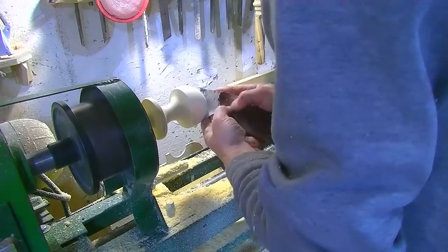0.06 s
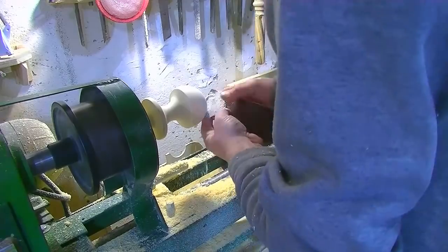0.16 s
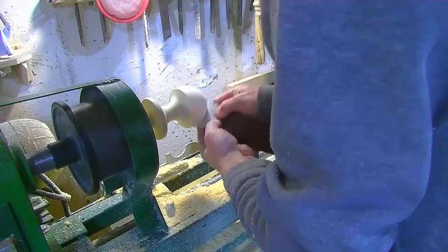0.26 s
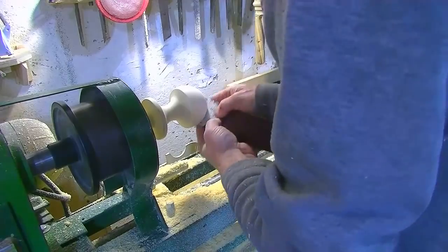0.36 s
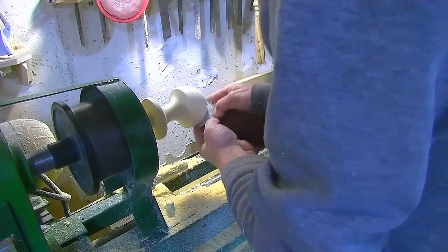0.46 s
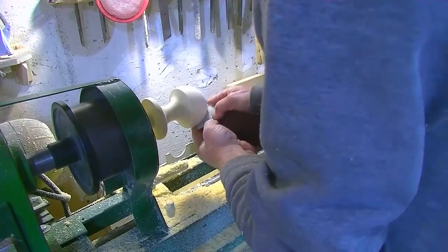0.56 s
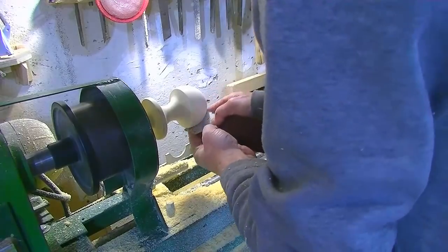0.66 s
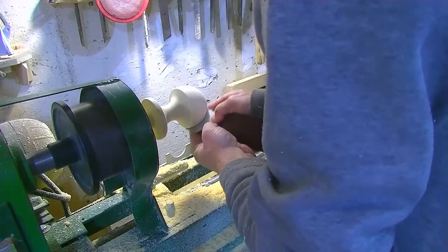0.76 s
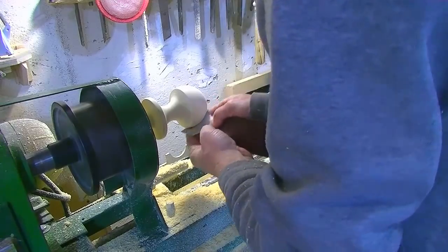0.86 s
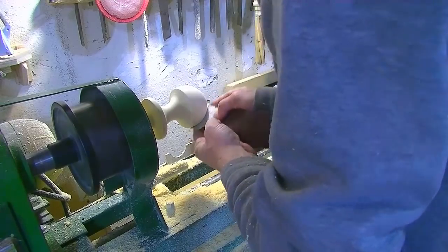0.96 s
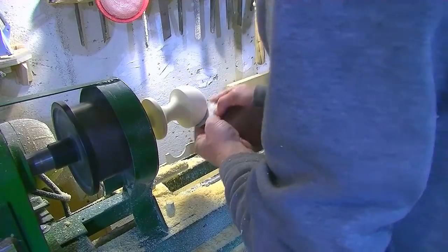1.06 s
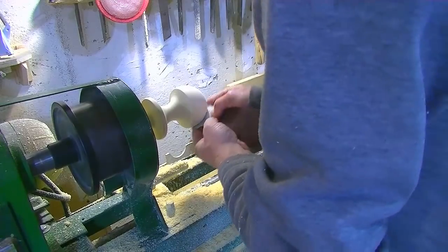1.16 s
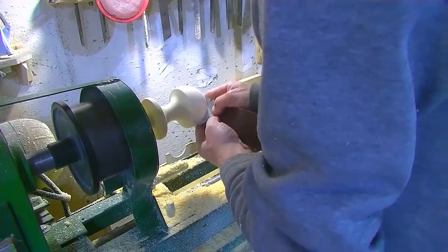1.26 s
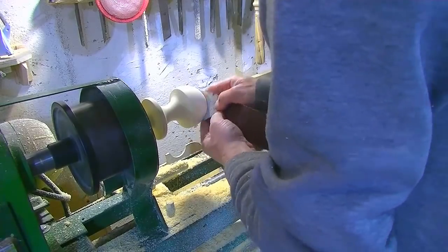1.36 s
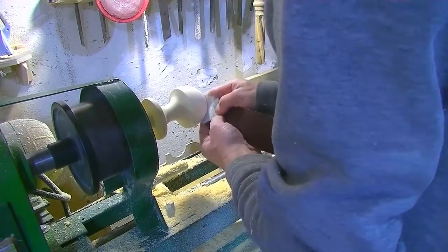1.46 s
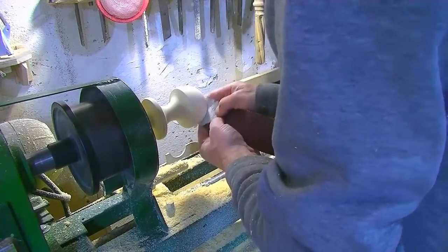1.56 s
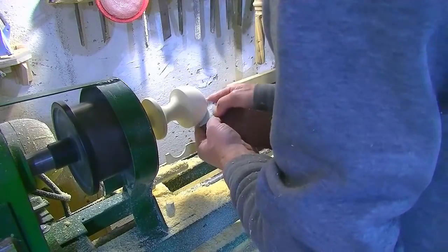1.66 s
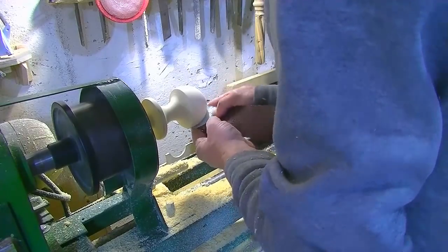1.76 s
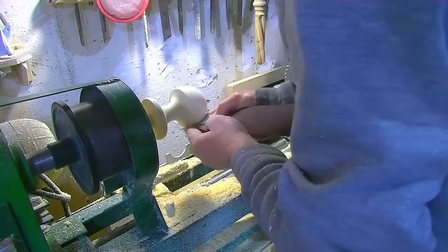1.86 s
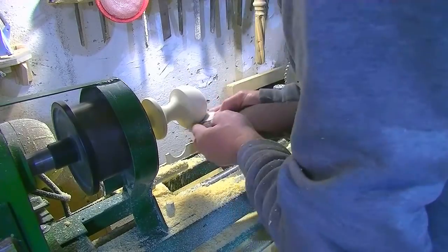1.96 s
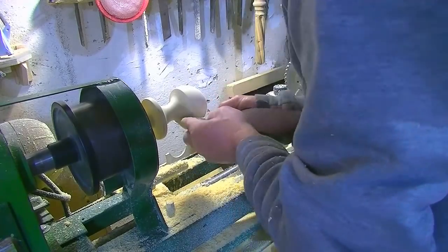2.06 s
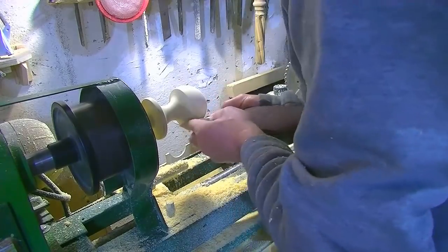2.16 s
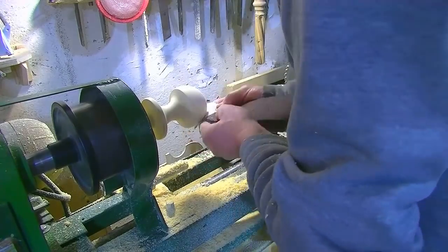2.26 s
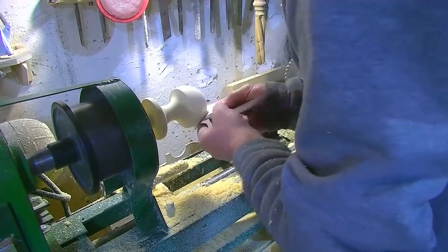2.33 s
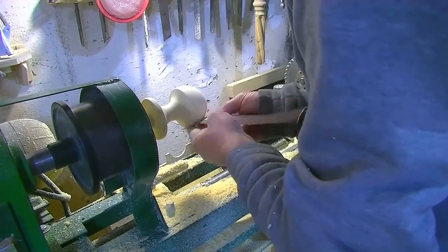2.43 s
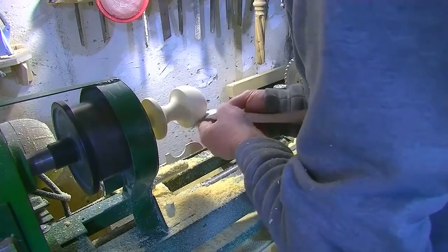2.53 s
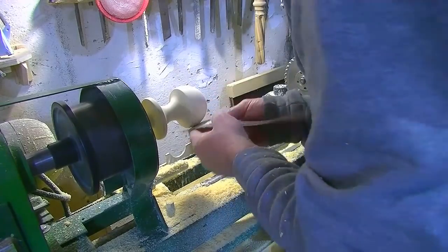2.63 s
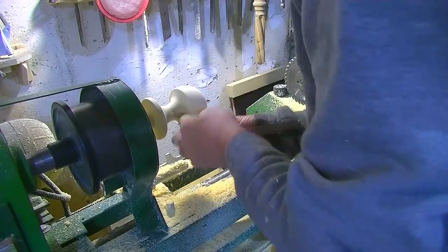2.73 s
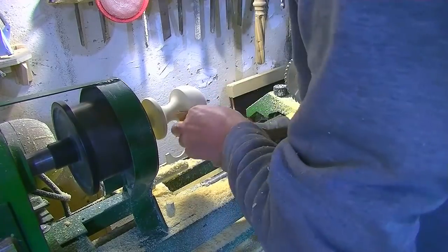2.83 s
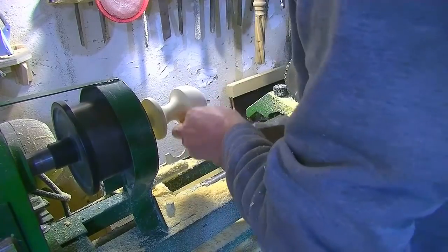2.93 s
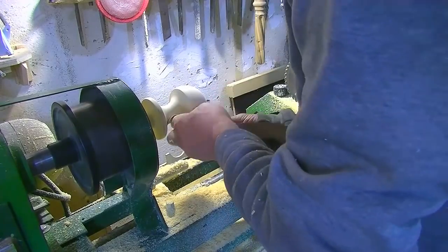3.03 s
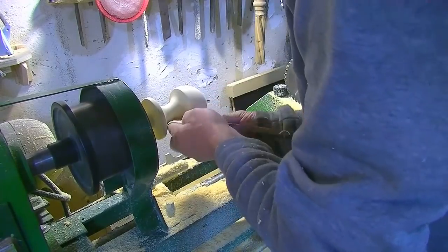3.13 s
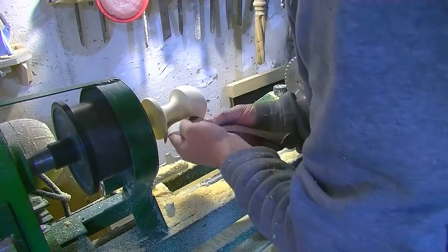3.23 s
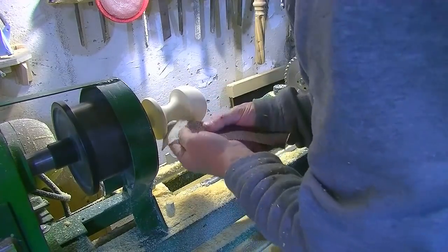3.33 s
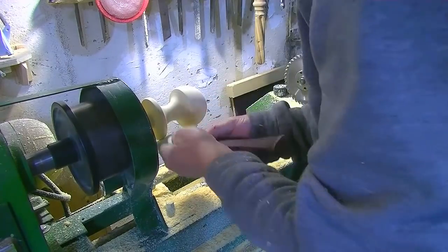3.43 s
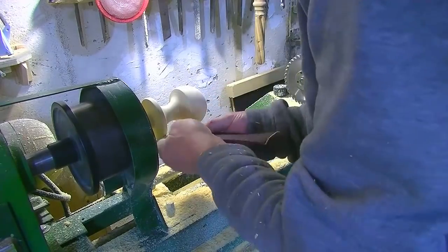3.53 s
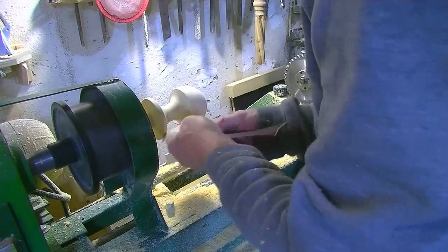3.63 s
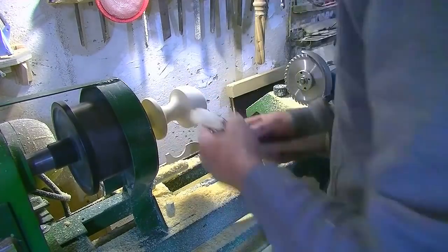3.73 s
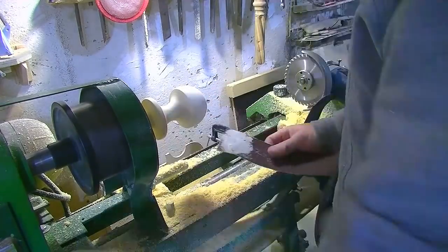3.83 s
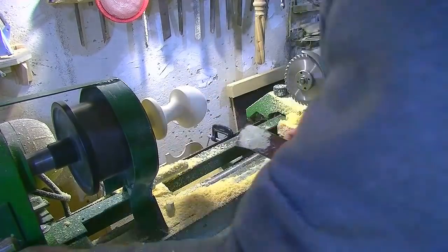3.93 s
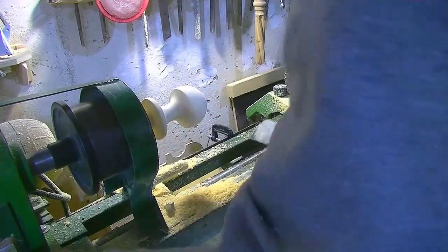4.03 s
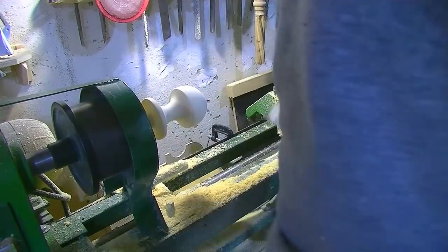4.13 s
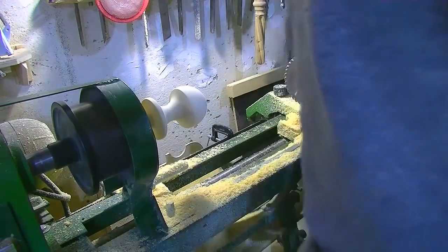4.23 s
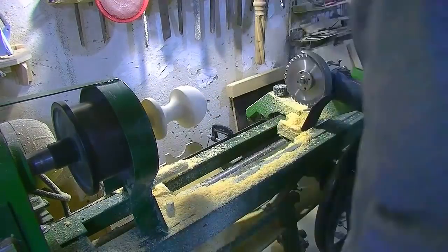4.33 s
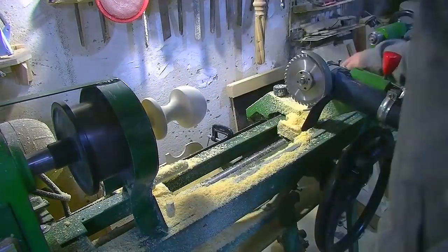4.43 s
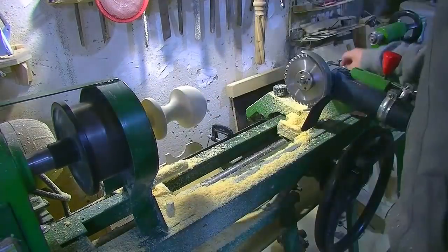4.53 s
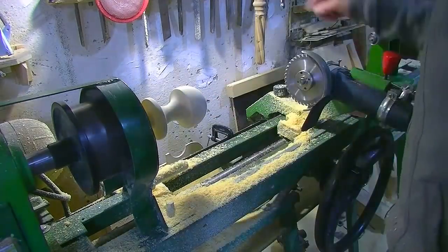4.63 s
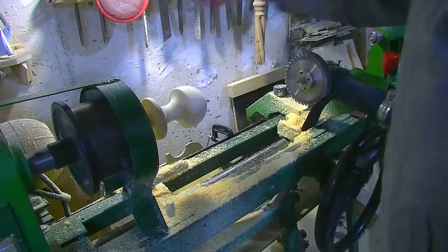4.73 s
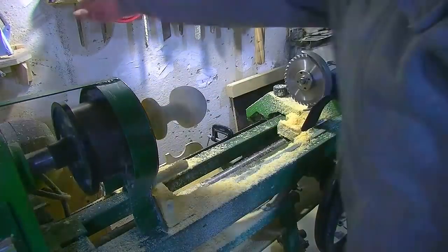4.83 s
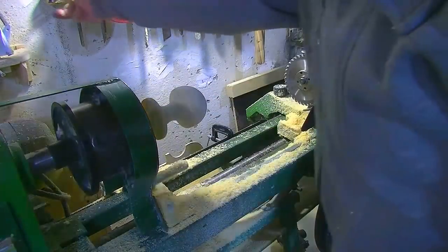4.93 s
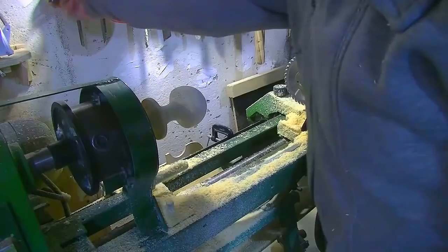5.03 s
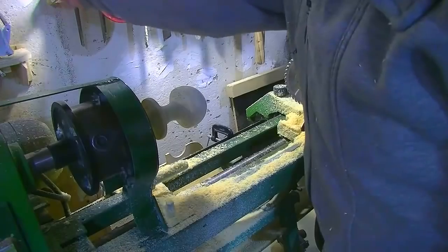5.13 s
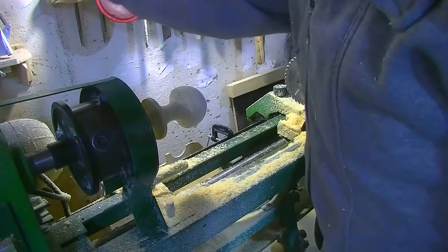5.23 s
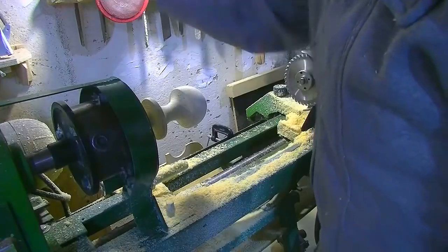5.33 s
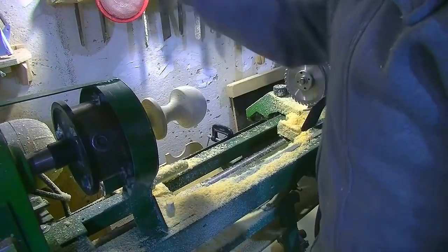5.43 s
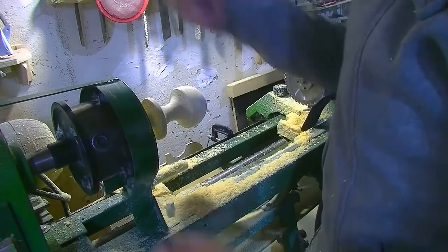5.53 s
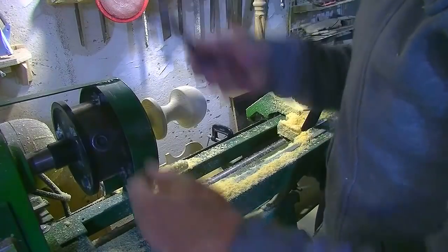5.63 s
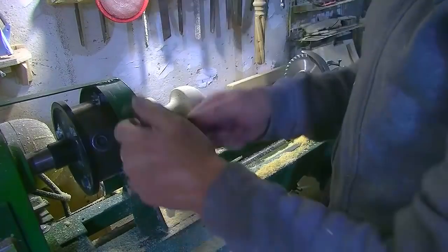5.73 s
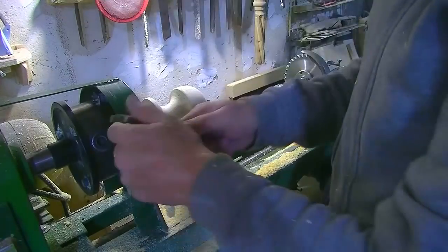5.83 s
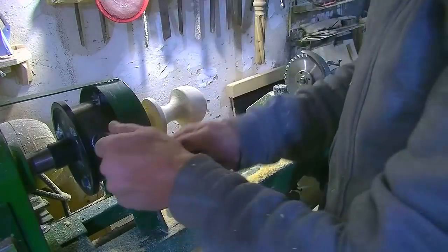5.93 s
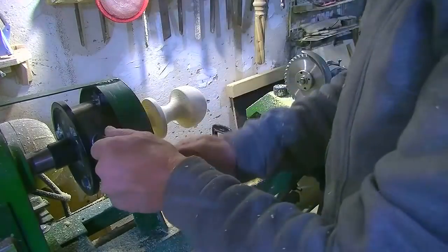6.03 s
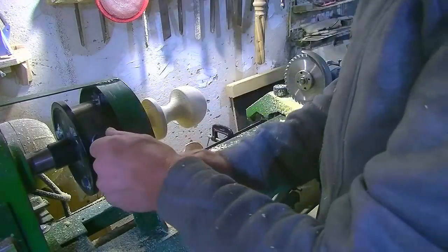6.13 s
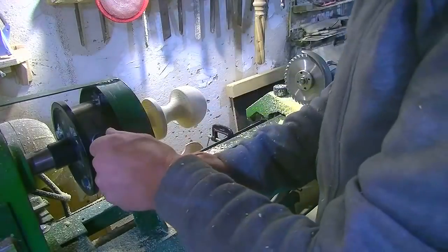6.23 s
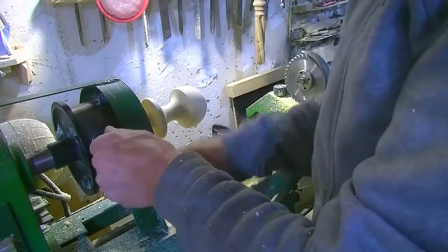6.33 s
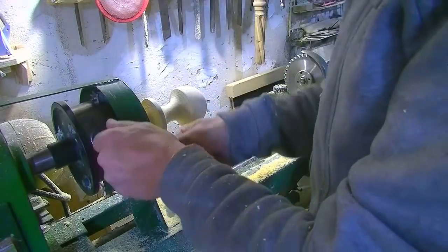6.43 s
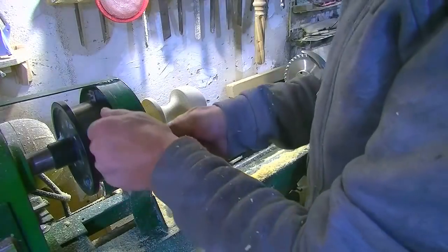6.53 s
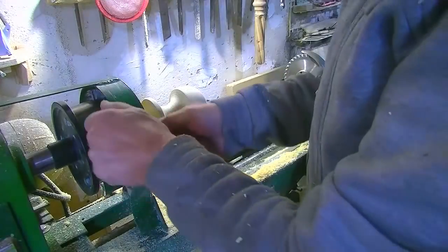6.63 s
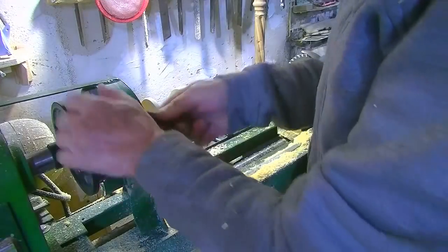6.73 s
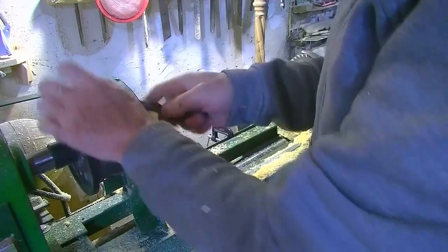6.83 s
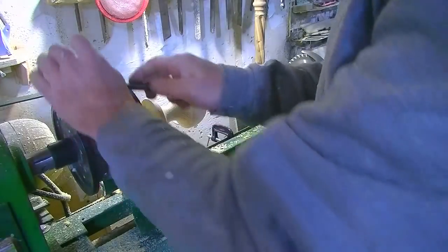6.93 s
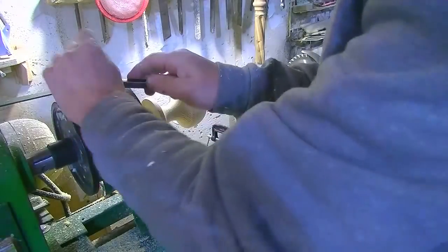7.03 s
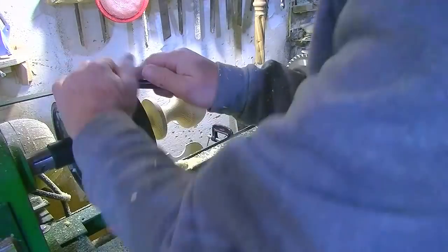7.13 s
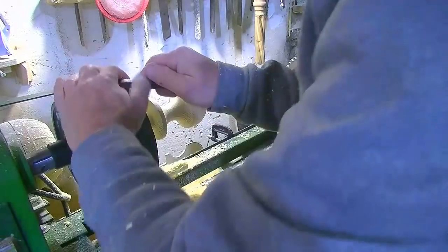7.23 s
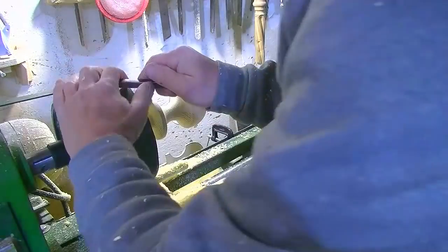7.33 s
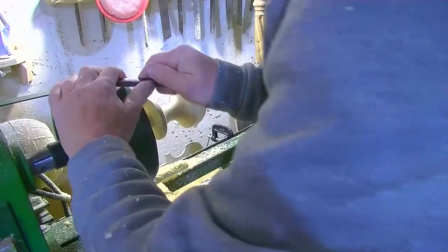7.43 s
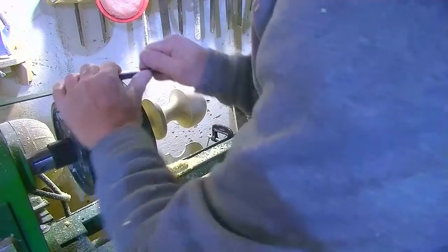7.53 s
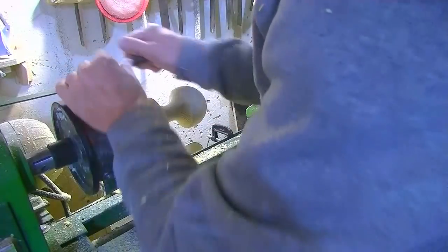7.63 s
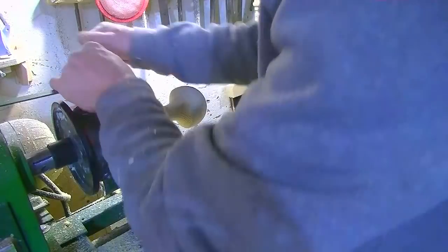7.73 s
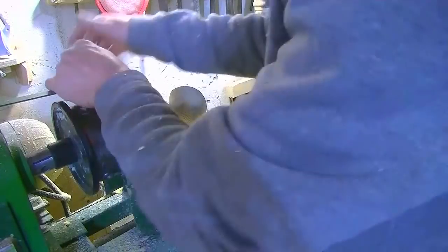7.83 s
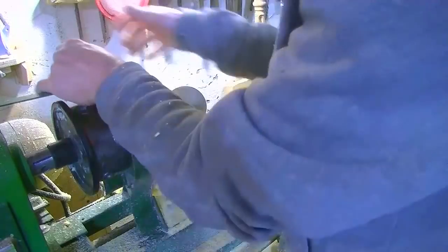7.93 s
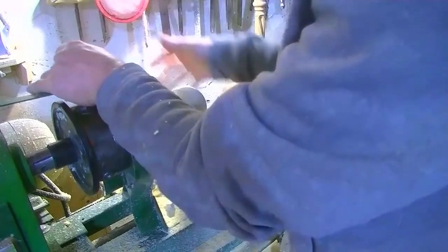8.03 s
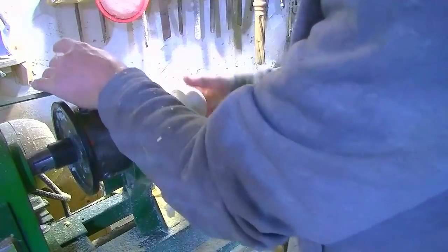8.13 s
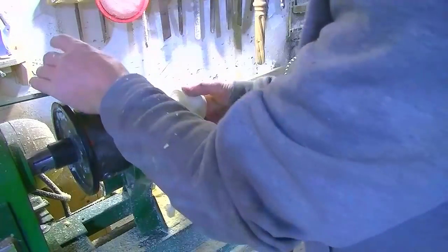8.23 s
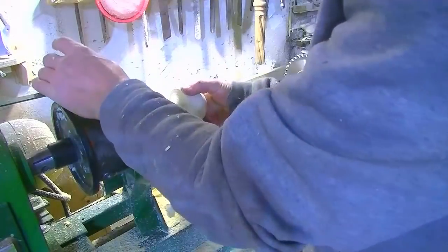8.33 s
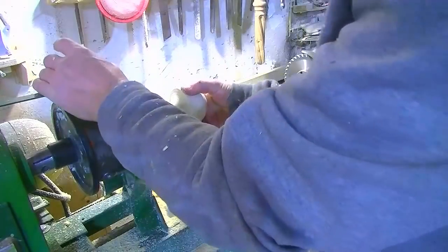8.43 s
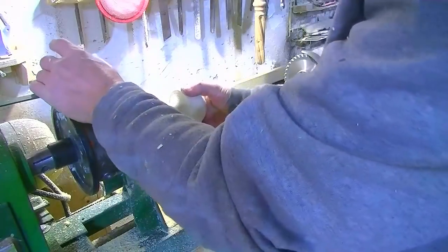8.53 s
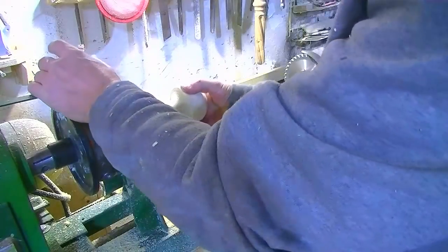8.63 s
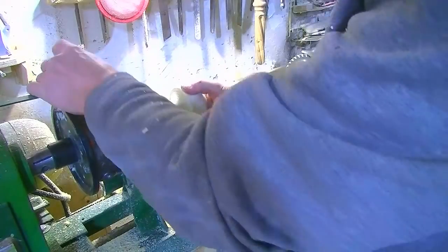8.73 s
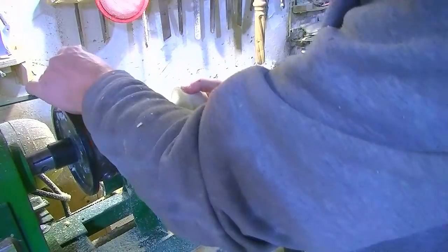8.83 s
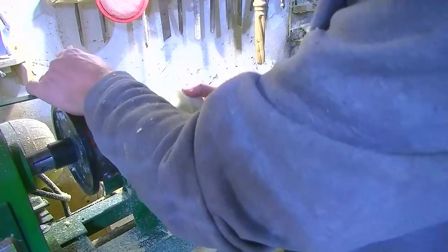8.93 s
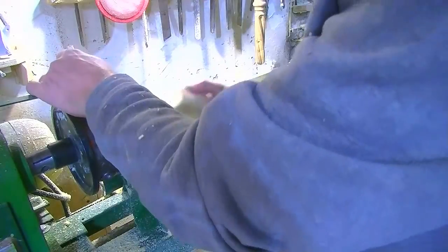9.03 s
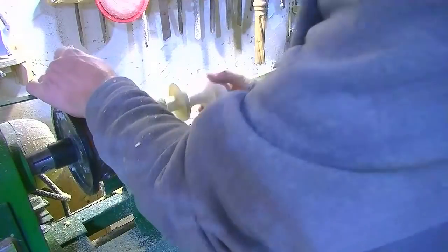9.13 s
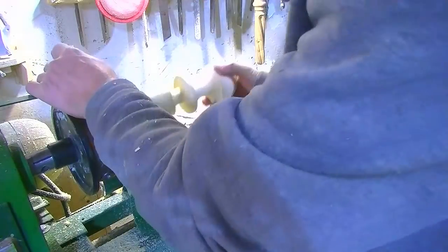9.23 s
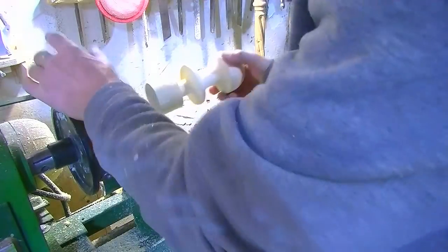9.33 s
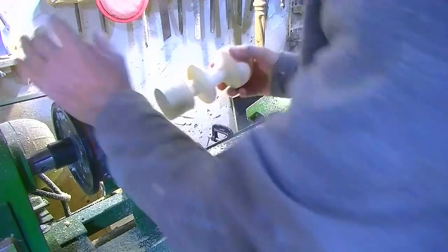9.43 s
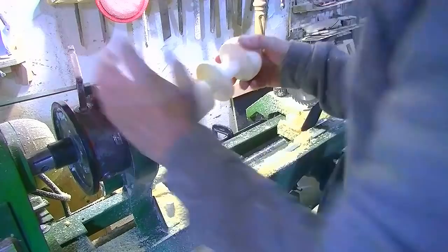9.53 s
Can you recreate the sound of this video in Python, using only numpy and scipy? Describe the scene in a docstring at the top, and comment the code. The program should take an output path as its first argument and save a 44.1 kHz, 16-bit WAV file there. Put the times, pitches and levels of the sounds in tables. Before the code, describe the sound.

Sandpaper buzzes fast on a spinning wooden knob over a whirring lathe, the machine fades, then a steel key clinks and hard knocks free the work.

```python
"""Sandpaper rasps a wooden knob spinning on a small lathe, close by in a small workshop: coloured noise
swells once a turn as the high spot bites. Under it the lathe whirrs (noise with housing resonances) and
the motor whines (shaft orders). The motor is switched off and the sound is faded out. Then hands fit a
steel key, knock the work loose and screw the knob off: resonant bursts and struck modes, with sparse room
echoes, over still air, a thin whistle, cloth and short slides."""
import sys
import numpy as np
from scipy import signal
from scipy.io import wavfile
from scipy.ndimage import uniform_filter1d

SR = 44100
rng = np.random.default_rng(int(sys.argv[2]) if len(sys.argv) > 2 else 0)


def store_wav(level_fs):
    """Save 16-bit WAV to argv[1]."""
    pcm = np.round(np.clip(np.atleast_2d(level_fs), -1, 1) * 32767)
    wavfile.write(sys.argv[1], SR, pcm.T.astype(np.int16))


N = 422037
T = np.arange(N) / SR  # s
QUIET_FROM_S = 4.935  # the quiet workshop fades in; from here on handling also rings bench and headstock


def amp(db):
    """Amplitude factor of a level in dB."""
    return 10 ** (np.asarray(db) / 20)


def evened(x):
    """Scales a signal to power 1."""
    return x / np.sqrt(np.mean(x ** 2) + 1e-20)


def read(points, hz):
    """Value of a (Hz, value) table on a log axis."""
    f, value = np.transpose(points)
    return np.interp(np.log(hz + 1), np.log(f + 1), value)


def columns(rows):
    """Each column of a curve table at every sample."""
    s, *cols = np.transpose(rows)
    return [np.interp(T, s, c) for c in cols]


def held(start, end, rise_db_per_s, fall_db_per_s):
    """Level in dB: 0 from start to end, sloping away before and after."""
    return np.minimum(0, np.minimum(rise_db_per_s * (T - start), fall_db_per_s * (end - T)))


def resonate(x, hz, width):
    """A resonance of gain 1 that follows the curve hz."""
    turn = np.exp(2j * np.pi * np.cumsum(hz * np.ones(x.shape[-1])) / SR)
    r = np.exp(-np.pi * width / SR)
    return 2 * (turn * signal.lfilter([1 - r], [1, -r], x / turn)).real


def resonate_twice(x, hz, width):
    """Two equal resonances in a row, for steeper skirts."""
    return resonate(resonate(x, hz, width), hz, width)


def flicker(ms, db):
    """Random gain of power 1 that changes within ms."""
    drift = evened(uniform_filter1d(rng.standard_normal(N), max(int(ms * SR / 1000), 1)))
    return evened(amp(db * drift))


# Likeness of the two microphone channels near the lathe: pitch_hz, likeness (0 to 1)
LIKENESS = [(60, .3), (500, 0.95), (15000, 0.9)]
# Left-right balance, positive to the left: pitch_hz, level_db
LEAN = [(200, 0.2), (5000, 3.), (15000, 2.5)]


def noise(spectrum, patchy_db, alike, modes=()):
    """Stereo noise with colour and drifting patches; alike scales left-right likeness and lean."""
    frames, hz = N // 256 + 5, np.fft.rfftfreq(1024, 1 / SR)
    a, b, c, d, patches = rng.standard_normal((frames, 513, 5)).T
    patches = evened(uniform_filter1d(uniform_filter1d(patches, size=14, axis=0), size=10, axis=1))
    same = np.clip(alike * read(LIKENESS, hz), -1, 1)[:, None]
    left = a + 1j * b
    right = same * left + np.sqrt(1 - same ** 2) * (c + 1j * d)
    peaks = sum(amp(db) ** 2 / (1 + (2 * (hz - f) / w) ** 2) for f, w, db in modes)
    colour = amp(read(spectrum, hz)) * np.sqrt(1 + peaks)
    lean = amp(np.outer([.5, -.5], alike * read(LEAN, hz)))
    z = np.array([left, right]) * (lean * colour)[:, :, None] * amp(patchy_db * patches)
    return evened(signal.istft(z, nperseg=1024, noverlap=768)[1][:, :N])


def add(mix, s, db, pan_db, sound):
    """Places a sound at s, scaled to its peak; positive pan leans left."""
    part = mix[:, round(s * SR):][:, :len(sound)]
    gain = amp(db + np.array([[.5], [-.5]]) * pan_db)
    part += (gain * sound / abs(sound).max())[:, :part.shape[1]]


def rung(modes, drive, sharp_db):
    """A drive rings a set of modes, tilted by sharp_db an octave about 2500 Hz."""
    t = T[:len(drive)]
    ring = 0
    for hz, db, t60 in modes:
        level_db = db + sharp_db * np.log2(hz / 2500) - 60 * t / t60
        ring = ring + amp(level_db) * np.sin(2 * np.pi * hz * t)
    return signal.fftconvolve(drive, ring)[:len(t)]


# Colour of the still air: pitch_hz, level_db per Hz
HUSH = [(40, -23.5), (150, -16), (280, -4.5), (600, -5.5), (2500, -11), (13000, -23), (16000, -18.5)]
HUSH_DB, WHISTLE_HZ, WHISTLE_DB = -62, 14610, -75  # a thin electric whistle
# Colour of hands shuffling on wood and iron: pitch_hz, level_db per Hz
SHUFFLE = [(60, -56), (200, -14), (500, 0), (1100, 3.5), (2500, -2), (5000, -11), (9000, -30)]
# Colour of rustling cloth: pitch_hz, level_db per Hz
RUSTLE = [(1500, -24.5), (3000, -6.5), (5000, -8), (10400, -6), (16000, -20)]
# Movements of hands and sleeves: start_s (at full level), hold_s, shuffle_db, rustle_db
MOVES = [(4.974, 0.016, -54, -60), (5.105, 0.049, -45.5, -55.5), (5.507, 0.02, -63, -60.5),
         (6.5, 0.52, -66, -72), (6.984, 0.31, -61, -62), (7.637, 0.029, -53.5, -52.5),
         (7.738, 0.031, -65, -52.5), (7.874, 0.085, -59, -59.5), (8.086, 0.14, -68, -68.5),
         (9.12, 0.0075, -53.5, -85), (9.483, 0.053, -53, -69.5)]
RISE_DB_PER_S, FALL_DB_PER_S = 264, 145.5


def workshop():
    """Still air and rubbing hands and sleeves are coloured noise; the whistle is a steady sine."""
    shuffle = rustle = 0
    for s, hold, shuffle_db, rustle_db in MOVES:
        move_db = held(s, s + hold, RISE_DB_PER_S, FALL_DB_PER_S)
        shuffle = shuffle + amp(move_db + shuffle_db)
        rustle = rustle + amp(move_db + rustle_db)
    hands = shuffle * noise(SHUFFLE, patchy_db=1.5, alike=.85) * flicker(ms=6., db=2.5)
    cloth = rustle * noise(RUSTLE, patchy_db=.8, alike=.7) * flicker(ms=4., db=1.2)
    still = amp(HUSH_DB) * noise(HUSH, patchy_db=2.0, alike=0.0205)
    whistle = amp(WHISTLE_DB) * np.sin(2 * np.pi * WHISTLE_HZ * T)
    fade_in = np.clip((T - QUIET_FROM_S) / 0.028, 0, 1)
    return fade_in * (hands + cloth + still + whistle)


# Low thuds under the handling: start_s, level_db (peak)
THUDS = [(7.069, -66), (7.699, -69), (8.683, -69)]
THUD_HZ, THUD_T60_S = 79.6, 0.48


def thuds():
    """Soft low bumps through the bench: noise in a low resonance, rising softly and dying away."""
    out, t = np.zeros((2, N)), T[:12000]
    for s, db in THUDS:
        bump = resonate_twice(rng.standard_normal(len(t)), THUD_HZ, 80)
        add(out, s, db, .3, bump * np.minimum(t / 0.014, 1) * amp(-60 * t / THUD_T60_S))
    return out


# Something is slid along the bench: start_s, end_s, level_db, start_pitch_hz, end_pitch_hz
SLIDES = [(5.072, 5.134, -45.5, 2040, 1120), (5.19, 5.208, -47, 2760, 2430)]


def slides():
    """Short scrapes: rubbing noise in a resonance that glides while they last."""
    grit = noise(SHUFFLE, patchy_db=0.0, alike=0.75) * flicker(ms=1.8, db=1.5)
    out = 0
    for start, end, db, start_hz, end_hz in SLIDES:
        glide_hz = np.interp(T, [start, end], [start_hz, end_hz])
        level = amp(db + held(start, end, 1500, 480))
        out = out + level * evened(resonate(grit, glide_hz, 990))
    return out


BENCH_HZ, BENCH_DB, BENCH_T60_S = 388, -10.5, 0.188  # each kind of hit takes its own share of this level


def boom():
    """A short low resonance of the bench, swelling in and dying away."""
    t = T[:5000]
    body = evened(resonate_twice(rng.standard_normal(len(t)), BENCH_HZ, 260))
    return body * amp(BENCH_DB - 60 * t / BENCH_T60_S) * np.minimum(t / 0.039, 1)


# Modes of the headstock: pitch_hz, level_db, t60_s
HEADSTOCK = [(560, -16, .08), (772, -6, .12), (890, -5, .15), (1005, -6, .15), (1172, -6, .12),
             (1254, 0, .1), (1440, 2, .1), (1505, -3, .13), (2090, -7, .05), (2420, -4, .06),
             (2552, -8, .13), (3235, -7, .12), (3390, -5, .14), (4550, -11, .015)]
# Dull knocks of handling: start_s, level_db (peak), body_pitch_hz, treble_db (over the body), t60_s
KNOCKS = [(4.076, -52, 820, -8, 0.12), (4.356, -48, 1000, -24, 0.06), (4.39, -50.5, 980, -24, 0.06),
          (4.581, -49, 1500, -1, 0.033), (4.596, -52, 1400, -4, 0.024), (5.132, -30.5, 600, -16, 0.058),
          (5.201, -28.5, 890, -12, 0.21), (5.755, -48, 830, -15, 0.073), (6.229, -38, 520, -3, 0.1),
          (7.004, -42, 495, -22, 0.021), (7.53, -48.5, 1830, -21, 0.075), (7.551, -40.5, 480, 3, 0.074),
          (7.562, -42.5, 1360, -18, 0.044), (8.368, -45, 1390, -18, 0.05), (8.992, -42.5, 850, -9, 0.094),
          (9.095, -38, 400, -16, 0.09), (9.121, -41, 670, -2.5, 0.14), (9.152, -35.5, 1130, 2.5, 0.032),
          (9.501, -37, 850, -5, 0.23)]


def knocks():
    """Noise rings a broad body and some treble; later knocks also shake bench and headstock."""
    out, t = np.zeros((2, N)), T[:5000]
    for s, db, hz, treble_db, t60 in KNOCKS:
        grit = rng.standard_normal((2, len(t)))
        grit[0, 40] = 900 * amp(db)  # harder knocks start with one firm push
        fall = amp(-60 * t / t60) + 0.64 * amp(-60 * t / 0.024)
        fall *= np.minimum(t / 0.0016, 1)
        body = evened(resonate_twice(grit[0], hz, 0.5 * hz))
        treble = amp(treble_db) * evened(resonate_twice(grit[1], 2900, 3000))
        knock = fall * (body + treble)
        if s > QUIET_FROM_S:
            knock = knock + boom() + 0.035 * evened(rung(HEADSTOCK, fall * body, -2))
        add(out, s, db, 2.5, knock)
    return out


# Short-lived modes of small steel parts: pitch_hz
KEY_HZ = [1120, 1810, 2600, 3400, 3800, 4300, 5300, 6800, 7850, 9320]
# Sharp clicks of the switch, then of the steel key:
# start_s, level_db (peak), centre_hz, spread_hz, t60_s, loudest_mode_hz
CLINKS = [(4.071, -35, 6500, 3600, 0.04, 7400), (4.091, -44, 4500, 3000, 0.05, 3800),
          (4.569, -46, 2800, 2500, 0.032, 1810), (6.084, -16, 2920, 2630, 0.041, 2570),
          (6.139, -17.5, 2500, 2100, 0.036, 2930), (6.172, -18, 3820, 1820, 0.04, 3400),
          (6.174, -23.5, 7500, 3920, 0.031, 9000), (6.234, -37, 3600, 1500, 0.06, 3800),
          (6.432, -25, 4430, 3500, 0.037, 3430), (6.461, -34, 3000, 3080, 0.03, 3900),
          (6.869, -30, 3650, 803, 0.016, 3340), (9.154, -44, 3890, 2500, 0.04, 3400)]


def clinks():
    """A brief clatter rings the steel modes, one hardest, within a broad band."""
    out, t = np.zeros((2, N)), T[:5000]
    for s, db, hz, spread_hz, t60, ring_hz in CLINKS:
        clatter = rng.standard_normal(len(t)) * amp(-60 * t / t60) * np.minimum(t / 0.00016, 1)
        clatter[5] = 3.5  # one firm tick at the start
        steel = .6 * clatter + 1.3 * sum(resonate(clatter, f, 200) for f in KEY_HZ)
        steel += 2.2 * resonate(clatter, ring_hz, 300)
        clink = resonate_twice(steel, hz, 2.54 * spread_hz)
        clink += 0.12 * np.gradient(clatter) * amp(-60 * t / .01)  # bright edge
        if s > QUIET_FROM_S:
            clink += 0.24 * boom()
        add(out, s, db, 3.5, clink)
    return out


# Modes of the first contact: pitch_hz, level_db, t60_s
CRACK = [(1446, 3, 0.022), (2570, 6, 0.0082), (3680, -8, 0.0054), (5430, -17, 0.005)]
# Blows that free the work: start_s, level_db (peak), shudder_db (over the crack), shudder_s (before it dies),
# sharpness_db (an octave)
BLOWS = [(7.045, -7, -23, 0.057, 3), (7.679, -24.5, -25, 0.024, -16), (8.187, -42.5, -12.5, 0.021, -9.5)]


def blows():
    """A hard contact rings a crack, then the rattling loose parts ring the headstock."""
    out, t = np.zeros((2, N)), T[:16000]
    for s, db, shudder_db, shudder_s, sharp_db in BLOWS:
        grit = rng.standard_normal((2, len(t)))
        grit[0, 0] = 9  # one hard first contact
        crack = rung(CRACK, grit[0] * amp(-60 * t / 0.013), sharp_db)
        crack = signal.lfilter(*signal.butter(2, 700, "high", fs=SR), crack)
        shake = grit[1] * np.minimum(t / 0.0059, 1) * amp(-60 * np.maximum(t - shudder_s, 0) / 0.12)
        ring = evened(rung(HEADSTOCK, shake, sharp_db))
        ring += 0.6 * evened(resonate_twice(shake, 1500, 1300))
        shudder = amp(shudder_db) * ring / np.std(ring[:3000])
        add(out, s, db, 4.5, crack / abs(crack).max() + shudder)
    return out


# Reverberation of the workshop: pitch_hz, t60_s
ROOM = [(150, 0.86), (500, 0.47), (1500, 0.39), (10000, 0.23)]


def room(x):
    """Sparse echoes of random sign, each band dying at its own speed."""
    taps = np.zeros((2, 30000))
    at = np.arange(200, 29980, 20) + rng.integers(0, 20, (2, 1489))
    np.put_along_axis(taps, at, rng.choice([-1., 1.], at.shape), 1)
    hz, t, z = signal.stft(taps, SR, nperseg=256)
    # close microphones share the echoes, mostly in the bass
    shared = .15 + .75 / (1 + (hz[:, None] / 700) ** 2)
    z = np.array([z[0], shared * z[0] + np.sqrt(1 - np.minimum(shared, 1) ** 2) * z[1]])
    tail = signal.istft(z * amp(-60 * t / read(ROOM, hz)[:, None]), SR, nperseg=256)[1]
    return signal.fftconvolve(x, tail / np.linalg.norm(tail[0]), axes=1)[:, :N]


# Colour of the whirr: pitch_hz, level_db per Hz
WHIRR = [(30, -40), (200, -31), (550, -30.5), (800, -18), (2500, -12.5), (5000, -14), (9000, -18.5),
         (16000, -22.5)]
# Resonances of the lathe housing: pitch_hz, width_hz, level_db
HOUSING = [(450, 20, 12), (1830, 50, 8), (2530, 80, 7), (3440, 100, 7), (4500, 90, 10), (8000, 300, 5)]
# Other orders of the motor shaft: multiple (of the shaft speed), level_db (over the whine)
NEIGHBOURS = [(11, -17), (18, -17), (23, -16), (25, -12)]
SWITCH_S, FADE_END_S = 4.075, 4.93  # the motor is cut; the faded first part ends
# unscreened whirr, its step at the switch; the sound is faded out after the switch
RUN_DB, SWITCH_STEP_DB, FADE_DB_PER_S = -57, 1, 21
WHINE_HZ, WHINE_DB = 1366, -61  # multiple 22 of the motor shaft, unscreened
# for a time the hands screen the whirr; the whine is screened from the start until the same moment
SHADE_DB, WHINE_SHADE_DB = -4, -6.5
SHADE_FROM_S, SHADE_UNTIL_S, SHADE_S = 0.85, 2.68, 0.33  # SHADE_S: length of each change


def lathe():
    """Whirr ringing in the housing, and the whine of the motor with its neighbour orders."""
    screened = np.clip((SHADE_UNTIL_S - T) / SHADE_S + .5, 0, 1)
    whirr_screened = screened * np.clip((T - SHADE_FROM_S) / SHADE_S + .5, 0, 1)
    fade_db = (T > SWITCH_S) * (SWITCH_STEP_DB - FADE_DB_PER_S * (T - SWITCH_S))
    level = (T < FADE_END_S) * amp(RUN_DB + SHADE_DB * whirr_screened + fade_db)
    whirr = level * noise(WHIRR, patchy_db=1.3, alike=.95, modes=HOUSING) * flicker(ms=6., db=.9)
    # the speed is never quite steady
    wander = .001 * evened(uniform_filter1d(uniform_filter1d(rng.standard_normal(N), 9000), 9000))
    shaft = 2 * np.pi * WHINE_HZ / 22 * np.cumsum(1 + wander) / SR
    orders = flicker(ms=9., db=3.) * np.sin(22 * shaft)
    for k, db in NEIGHBOURS:
        orders += amp(db) * flicker(ms=80., db=3.) * np.sin(round(k) * shaft + k)
    powered = np.clip((SWITCH_S - T) / .005, 0, 1)
    whine = powered * np.sqrt(2) * amp(WHINE_DB + WHINE_SHADE_DB * screened) * orders
    return whirr + whine * amp([[1.2], [-1.2]])  # the whine leans left


# Sanding while the paper touches: start_s, scrape_db (before pressure), hiss_db, ring_db, rasp_db
# (these three over the scrape), rasp_pitch_hz (centre)
SAND = [(0, -57, 5, -3, -15, 2520), (.17, -57.5, 6.5, -5, -16, 2520), (.32, -53.5, 4, -22, -9.5, 1920),
        (.6, -53, 0.5, -9, -4, 3290), (1., -52, 1.5, -18, -13.5, 2860),
        (1.45, -54.5, -0.5, -12, -4.5, 2880), (2.1, -51.5, -0.5, -35, -6.5, 3570),
        (2.45, -54.5, 0, -23, -15, 3900), (2.7, -57, 4, -28, -33, 3815), (2.82, -57.5, 7.5, 0, -11, 3980),
        (3.1, -58.5, 9.5, 1, -5, 3500), (3.25, -58, 7, 4, 4, 4060), (3.42, -54.5, 2.5, 3.5, -5.5, 3900),
        (3.8, -59.5, 10, 5.5, -7, 3900)]
# Colour of the scrape: pitch_hz, level_db per Hz
SCRAPE = [(2000, -27), (3200, -8.5), (4500, -0.5), (6300, -0.5), (9000, -6), (16000, -44)]
# Colour of the fine hiss: pitch_hz, level_db per Hz
HISS = [(4000, -23.5), (7000, -6.5), (11000, -3), (16000, -4.5)]
# Colour of the coarse rasp: pitch_hz, level_db per Hz
RASP = [(800, 4.5), (1700, -11), (3600, -5), (6000, -1.5)]
# Resonances of the wooden knob: pitch_hz, width_hz, level_db
KNOB = [(1770, 110, 13.5), (6350, 33, 10), (7430, 62, 5.5)]
# Paper held on the wood: start_s, end_s, start_place_turns, end_place_turns (round the work)
TOUCHES = [(-.1, 2.71, 0.0014, 0.), (2.811, 3.47, -0.32, 0.013), (3.543, 3.746, 0.16, 0.059)]
SPINDLE_HZ = 33.4  # turns of the work a second
LIFT_DB_PER_S = 508  # how fast the scrape comes and goes at each touch and lift


def sanding():
    """Grit tears the wood; once a turn the high spot of the knob presses harder on the paper."""
    scrape_db, hiss_db, ring_db, rasp_db, rasp_hz = columns(SAND)
    gate = sum(amp(held(a, b, LIFT_DB_PER_S, LIFT_DB_PER_S)) for a, b, *_ in TOUCHES)
    touch = np.array(TOUCHES)
    place = np.interp(T, touch[:, :2].ravel(), touch[:, 2:].ravel())
    turns = SPINDLE_HZ * T - place
    spot = np.exp(1.4 * (np.cos(2 * np.pi * turns) - 1))
    # no two turns bite alike, nor in the same colour
    turn_index = (turns + 1.5).astype(int)
    uneven = 1 + .08 * rng.standard_normal(400)[turn_index]
    bite_hz = rasp_hz * (1 + .09 * rng.standard_normal(400))[turn_index]
    # the high spot bites a little deeper as the sanding goes on
    press = amp((5.5 + 0.41 * T) * (uneven * spot + 0.0172))
    press = press * flicker(ms=7, db=1.4) * flicker(ms=.15, db=1.0)
    scrape = noise(SCRAPE, patchy_db=2.4, alike=1., modes=KNOB)
    hiss = amp(hiss_db) * noise(HISS, patchy_db=.7, alike=0.95)
    knob_ring = evened(resonate_twice(scrape, 4590, 340))  # main mode of the knob
    ring = amp(ring_db) * flicker(ms=30., db=1.3) * knob_ring
    coarse = noise(RASP, patchy_db=2.6, alike=1., modes=KNOB)
    rasp = amp(rasp_db) * evened(resonate_twice(coarse, bite_hz, 1400))
    grit = gate * amp(scrape_db) * press * (scrape + hiss + ring + rasp)
    # the fast flicker spreads noise downward; the rasping keeps little below 900 Hz
    return signal.sosfilt(signal.butter(4, 900, "high", fs=SR, output="sos"), grit)


def scene():
    """All sources in the workshop; the small microphone takes little bass from the hits."""
    hits = knocks() + clinks() + blows()
    struck = signal.sosfilt(signal.butter(4, 250, "high", fs=SR, output="sos"), hits)
    background = workshop() + thuds() + slides()
    return background + struck + amp(-8) * room(struck) + lathe() + sanding()


EDGE_HZ = 15800


def record(dry):
    """The band limit of the recorder: a steep low-pass."""
    lowpass = signal.firwin(511, EDGE_HZ, window=("kaiser", 9), fs=SR)
    return signal.oaconvolve(dry, lowpass[None], "same")


dry = scene()
out = record(dry)
store_wav(out)
```